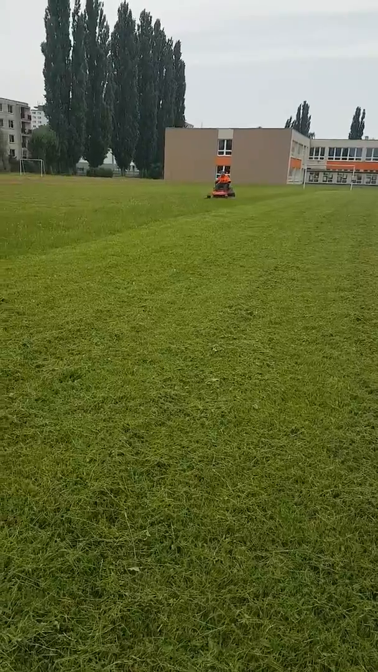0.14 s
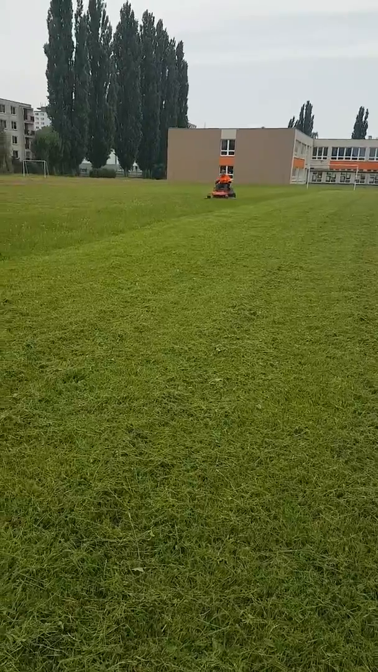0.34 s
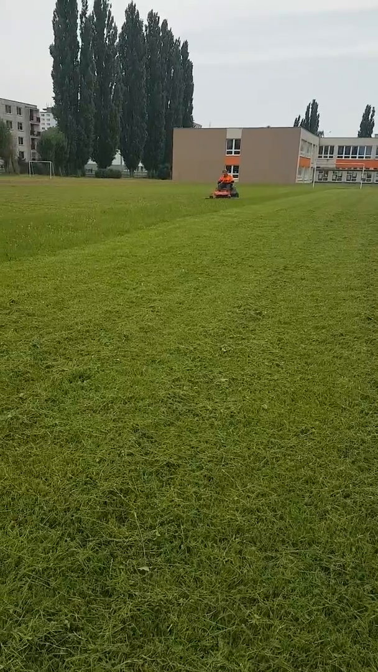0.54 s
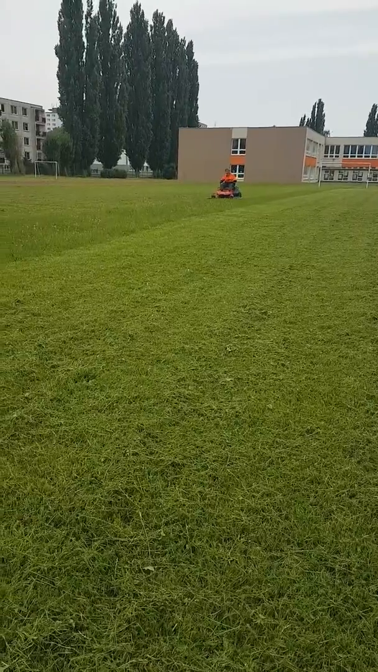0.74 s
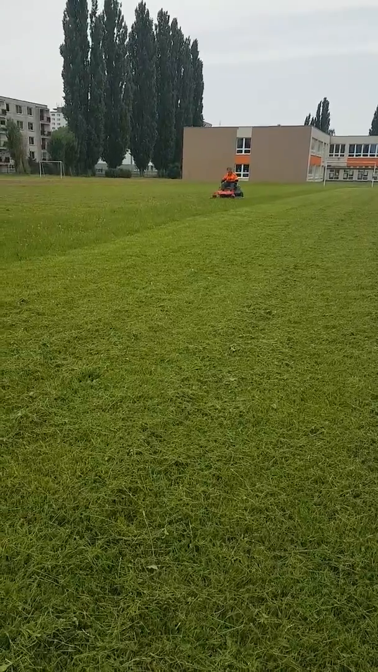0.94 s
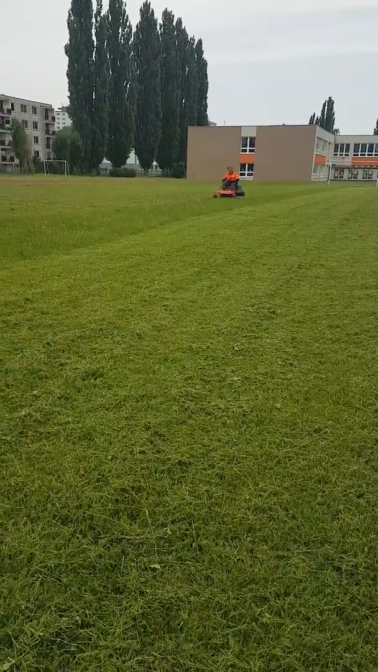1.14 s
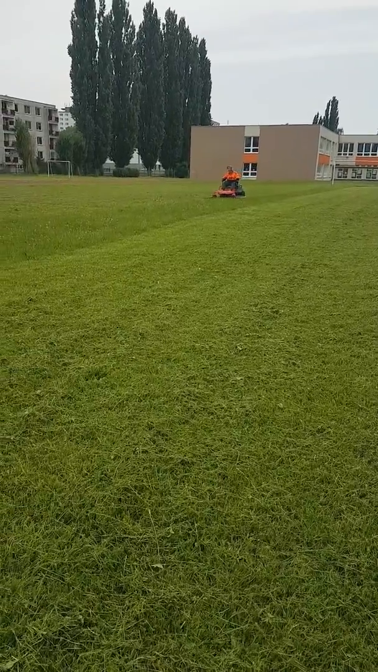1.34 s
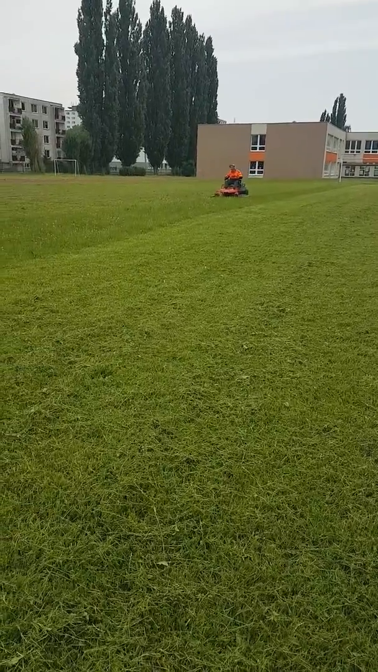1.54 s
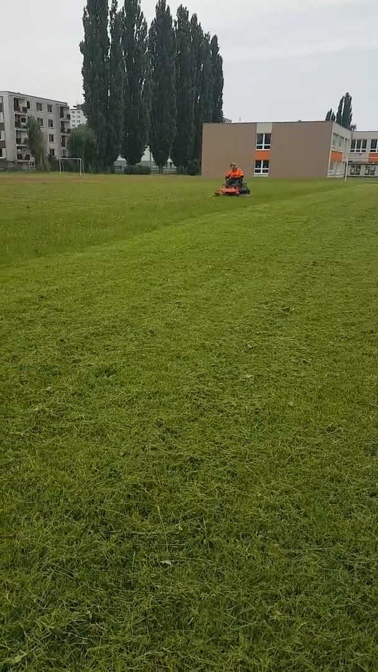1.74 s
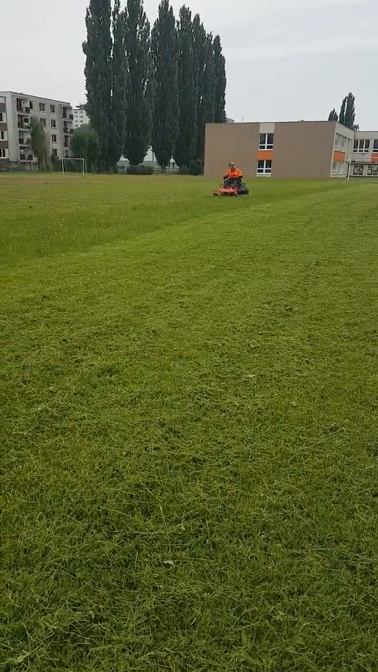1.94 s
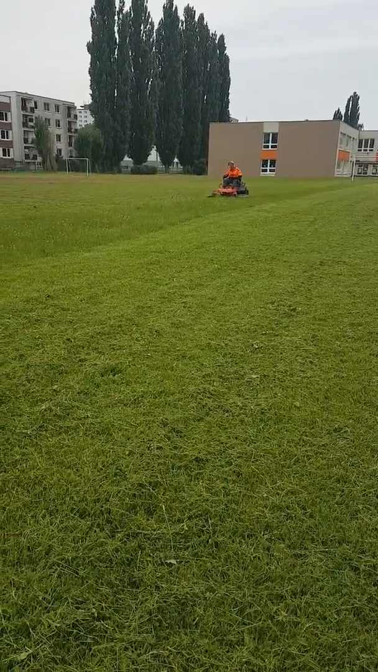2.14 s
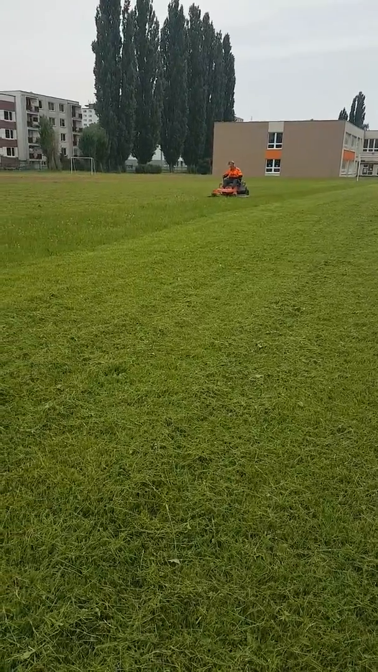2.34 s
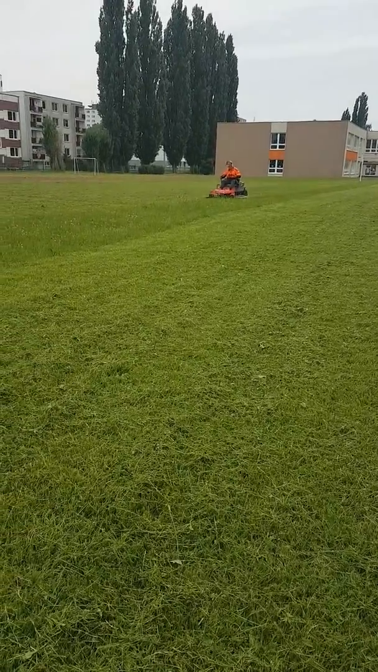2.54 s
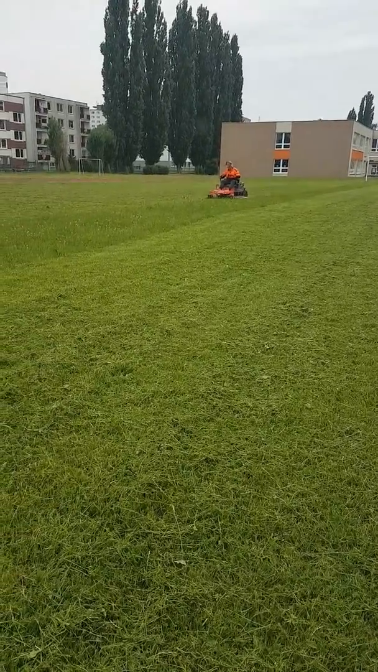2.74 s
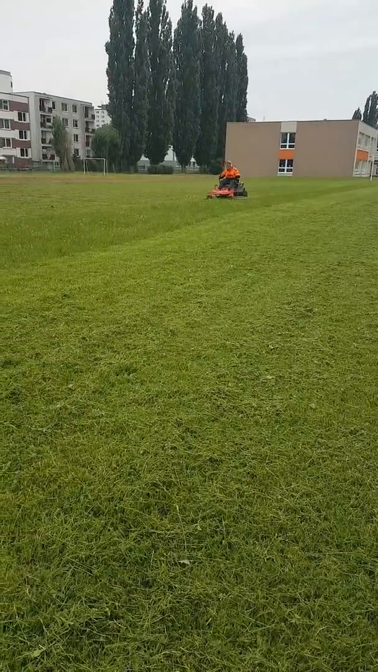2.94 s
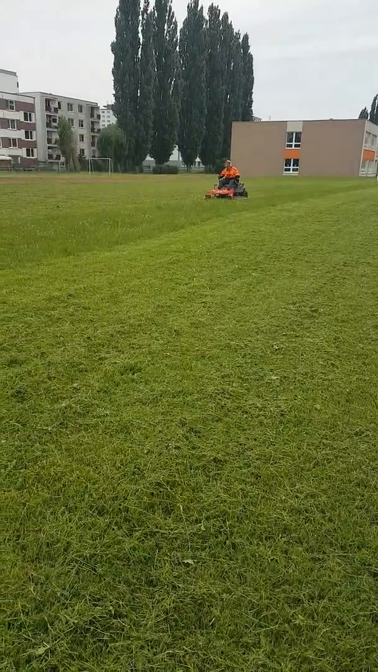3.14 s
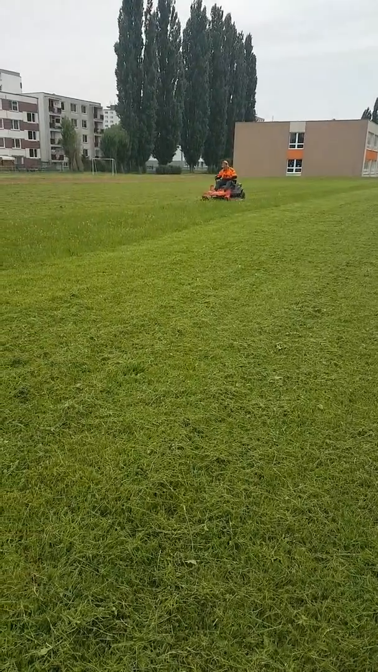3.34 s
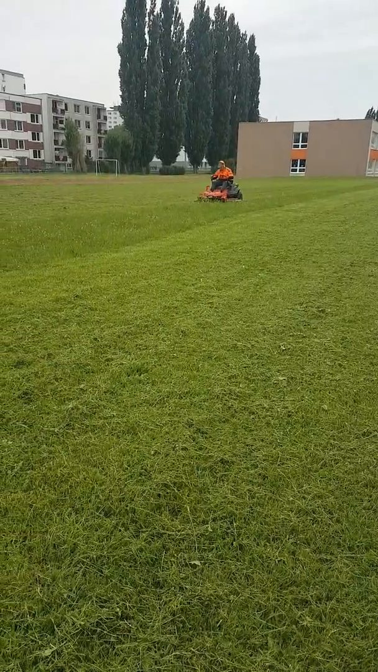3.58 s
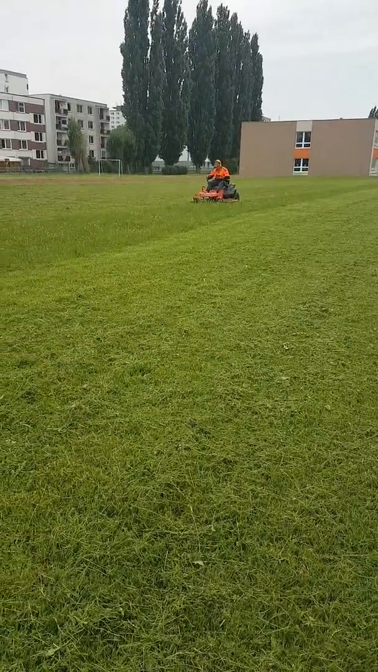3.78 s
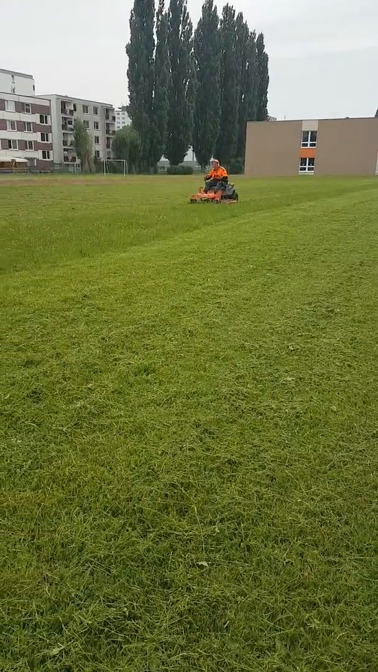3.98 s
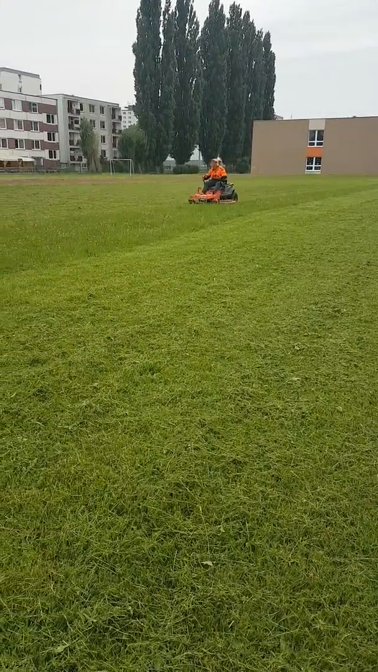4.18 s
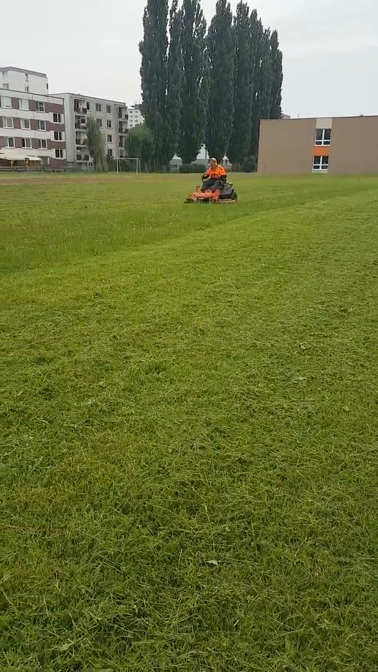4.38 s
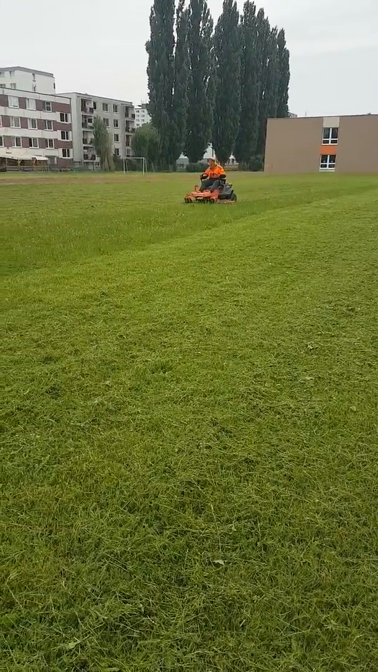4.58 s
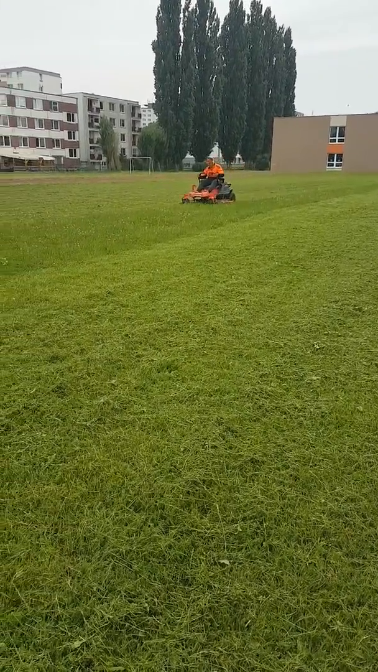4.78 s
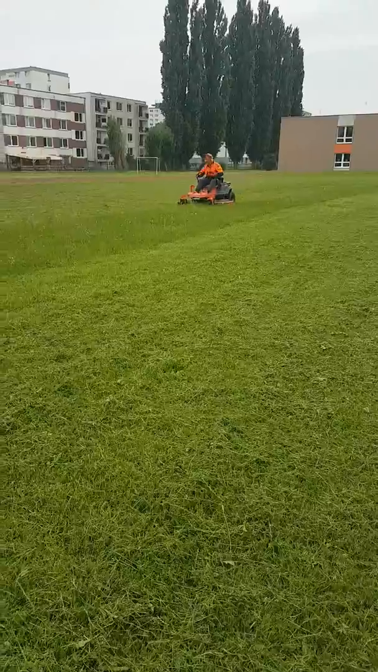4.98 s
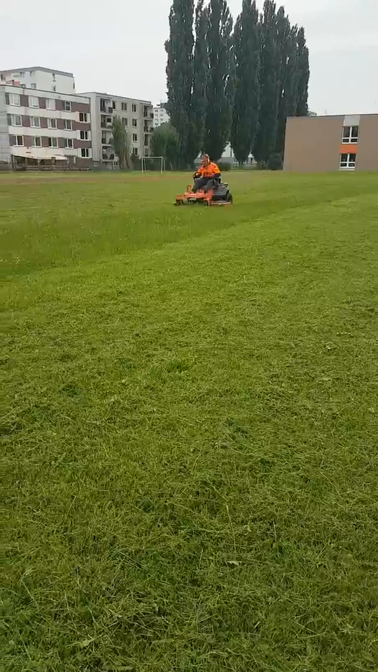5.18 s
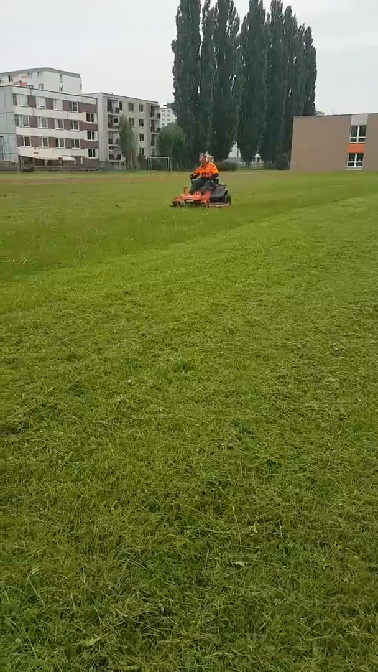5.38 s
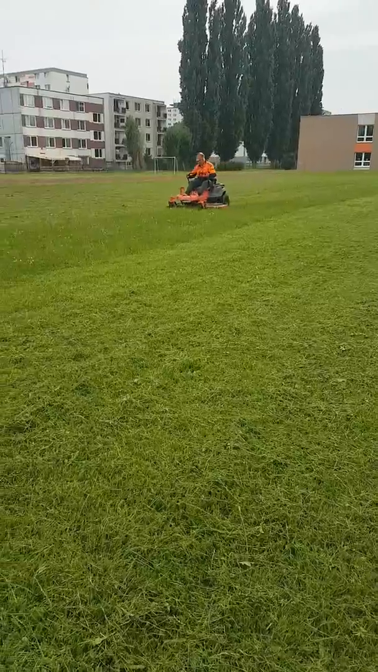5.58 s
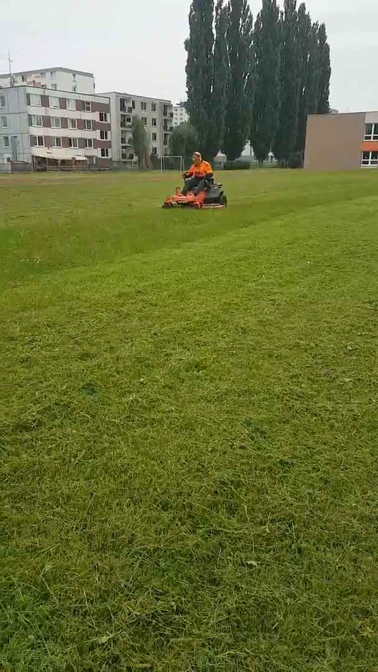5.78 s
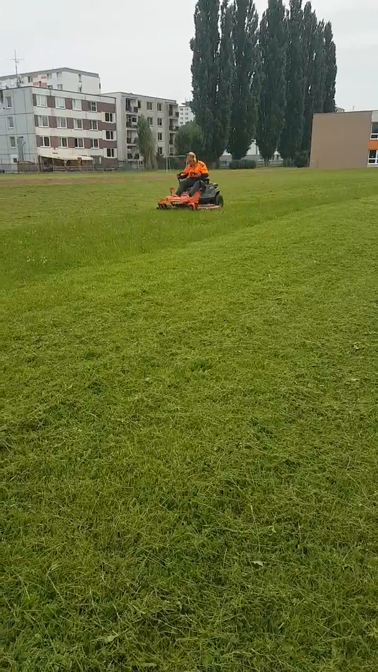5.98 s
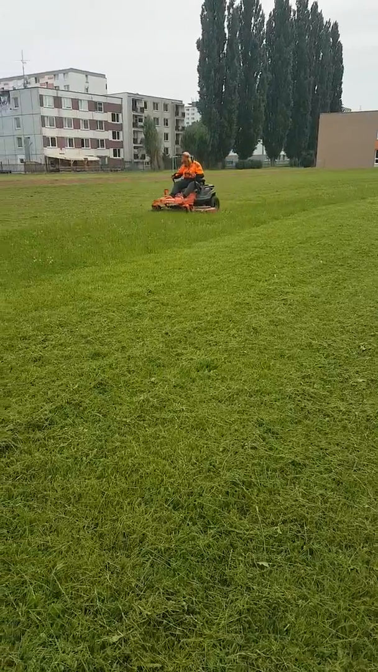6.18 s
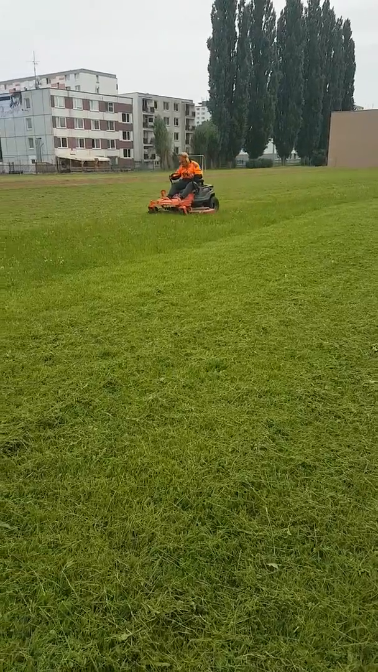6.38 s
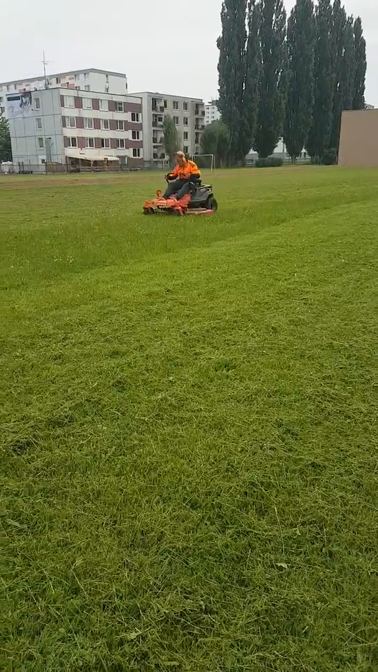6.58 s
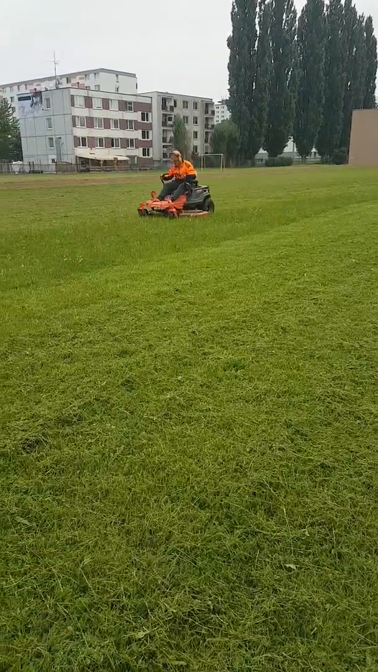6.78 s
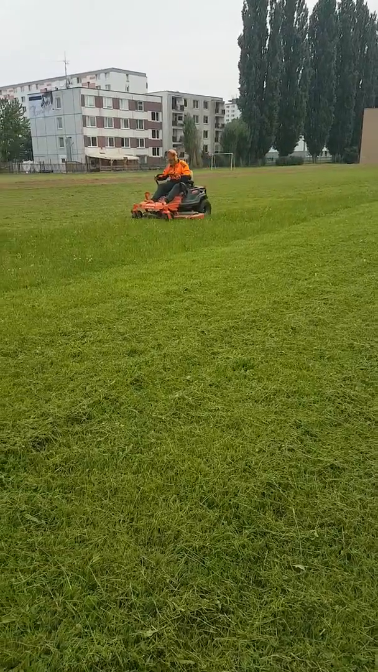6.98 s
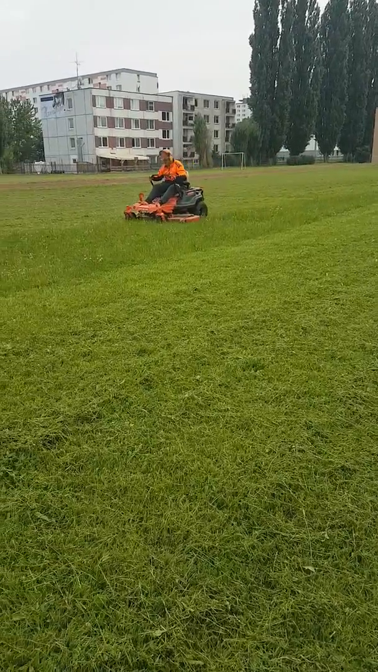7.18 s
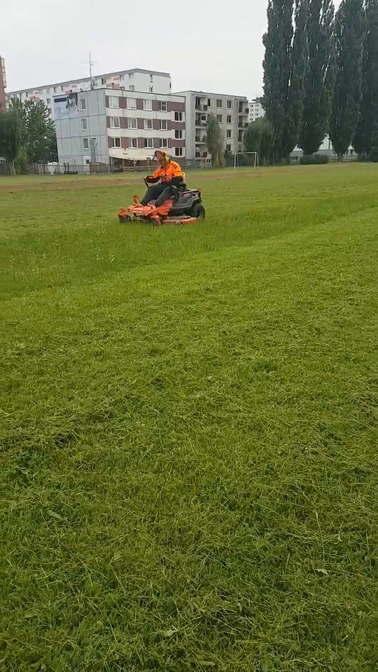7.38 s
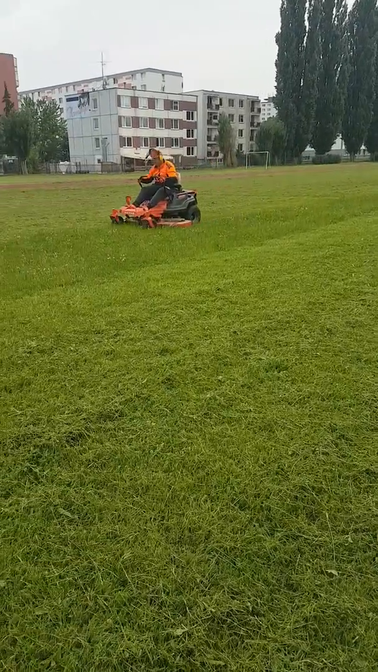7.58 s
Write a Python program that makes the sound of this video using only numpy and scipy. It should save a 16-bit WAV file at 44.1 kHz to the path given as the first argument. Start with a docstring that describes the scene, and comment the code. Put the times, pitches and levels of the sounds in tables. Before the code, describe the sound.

A riding mower approaches across an open field, its engine a steady low drone with rough airy roar and beating blade hum. Grass hisses and ticks under the deck. Finger bumps knock the hand-held microphone early on. The sound grows steadily, then deep bass and wind rumble swell in the last second; the mower never passes or fades.

```python
"""A riding mower comes closer across a wide lawn, heard at the two microphone ports of a hand-held case.
Its exhaust drones on tones tied to the engine cycle; three blades hum and beat as they slip apart.
Filtered noise makes the roar, deck rumble and grass hiss; clicks make ticks and snapping stalks.
The bass swells late on. Short echoes off hand and body colour each port in its own way.
A light wind rumbles on the ports and fingers bump the case."""
import sys
import numpy as np
from scipy import signal
from scipy.fft import rfft, irfft, next_fast_len
from scipy.io import wavfile

SR = 44100
rng = np.random.default_rng(int(sys.argv[2]) if len(sys.argv) > 2 else 0)


def waveform_to_disk(signal):
    """Save audio, clipped to [-1, 1], as 16-bit WAV at the path in sys.argv[1]."""
    frames = np.transpose(np.atleast_2d(signal))
    scaled = np.clip(frames, -1, 1) * 32767
    samples = np.round(scaled).astype(np.int16)
    wavfile.write(sys.argv[1], SR, samples)


N = 336042
SIZE = next_fast_len(N + 8192)  # filter length, padded so that tails do not wrap round
HZ = np.maximum(np.arange(SIZE // 2 + 1) * SR / SIZE, 1)
TIME_S = np.arange(N) / SR

# Straight approach: distance at the start, and driving speed
START_M, DRIVE_M_PER_S = 34.43, 3.384
# Base levels of the sources: (level_db at the start, growth in dB per dB of nearness)
EXHAUST_LEVEL, ROAR_LEVEL, DRONE_LEVEL = (-44.5, 0.47), (-46, 1.15), (-37.5, 0.85)
HISS_LEVEL, SIZZLE_LEVEL = (-46, 1), (-68, 1.69)
HISS_SHARE, ROAR_SHARE = 0.75, 0.29  # how far hiss and roar follow the thick patches
PASSES_PER_CYCLE = 4.515  # blade passes for each engine cycle, before slip
SLIP_LOSS_PER_S = .028  # share of the first slip lost each second
RIGHT_DB, RIGHT_LAG_MS = 1.6, .108  # the direct sound is louder and later at the right port
CUTOFF_HZ = 15700

# Engine speed, sagging under load: (time_s, speed in cycles per s)
ENGINE_SPEED = [(0.0, 23.53), (0.35, 23.29), (0.5, 23.41), (0.65, 23.36), (1.0, 23.7), (1.17, 23.43),
                (1.5, 23.73), (1.76, 23.43), (1.97, 23.7), (2.15, 23.57), (2.4, 23.79), (2.6, 23.6),
                (2.85, 23.93), (3.35, 23.9), (3.6, 23.37), (3.8, 23.6), (3.97, 23.51), (4.48, 24.15),
                (4.68, 24.25), (4.85, 23.42), (5.0, 23.33), (5.25, 23.82), (5.5, 23.5), (5.85, 23.97),
                (6.4, 23.78), (6.8, 23.92), (7.05, 23.62), (7.45, 24.13), (7.62, 24.0)]
# Bass change of exhaust and blades, with one dip and a late swell: (time_s, change_db)
BASS_SWELL = [(0, 0), (4.55, 0), (4.75, -5), (4.9, 0), (6.45, 0), (6.65, 3), (6.8, 8.5), (7.0, 14.5),
              (7.2, 15.5), (7.4, 13.5), (7.62, 15)]
# Thick patches of grass, plus a brief lift in level at 1.65 s during the finger bumps: (centre_s, extra sizzle
# in dB, length_s)
THICK_PATCHES = [(0.374, 3.5, 0.33), (1.65, 1, 0.057), (3.4, 2.5, 0.39), (3.852, 2.5, 0.38),
                 (5.118, 3.5, 0.51), (5.873, 3.5, 0.29), (6.72, 3, 0.055), (7.524, -1.5, 0.46)]
# Exhaust tones, the last row being a tone near the seventh blade pass: (multiple of the engine cycle, relative
# level_db)
EXHAUST_TONES = [(2, -15), (3, -19), (4, -16), (5, 0.5), (5.5, -13), (6, -6.5), (6.5, -12), (7, -10),
                 (8, 1), (9, -7), (10, -11), (11, -2), (12, -9), (12.9, -6), (13, -4), (14, 2), (15, -3),
                 (16, -6), (17, -9), (24.5, -9), (31.5, -15)]
# Three belt-driven blades: (slip at the start in passes per s, start angle in passes,
# then the level_db of multiples 1, 2, 3, 4 and 5 before growth and waver)
BLADE_HUMS = [(-.263, .04, -56, -49.5, -38, -61, -75), (0, 0, -57, -45, -62, -53, -64),
              (.359, .758, -59, -50, -41.5, -45, -57)]
# Growth of each hum multiple: (dB per dB of nearness, dB per dB of bass swell)
HUM_GROWTH = [(1.6, .66), (1.05, .7), (.55, .4), (1.5, 0), (1.5, 0)]
# Wavering of the blade hum: (time_s, change_db)
HUM_WAVER = [(0, -4), (.5, 1.5), (1.0, 1.5), (1.5, -3.5), (2.1, 1), (2.6, 2), (3.0, -1.5), (3.3, 0.8),
             (3.9, 0), (4.4, 1.5), (4.75, -1), (5.2, 4), (5.55, -2.5), (6.0, 3.7), (6.5, -0.8), (7.0, 0),
             (7.3, -1), (7.62, -3.5)]
# Faint whine of the middle blade: (time_s, level_db)
WHINE_LEVEL = [(0, -47.5), (1.1, -47.5), (1.4, -54), (3.0, -52), (3.5, -60), (7.62, -60)]
# Tones of the whine: (multiple of the blade pass, relative level_db)
WHINE_MULTIPLES = [(6, -5), (7, -1), (8, -8)]
# Tone colour of the roar: (frequency_hz, relative level in dB per Hz)
ROAR_COLOUR = [(380, 0), (470, 8.5), (550, 9.5), (760, -1.5), (900, -5.5), (1200, 0.5), (1700, 2.5),
               (2400, -3.5), (2900, -11), (3500, -5.5)]
# Ringing of the deck sheet under the air stream: (pitch_hz, width_hz, boost_db)
DECK_RINGS = [(757, 88, 2), (1151, 49, 4.5), (1715, 47, 6), (2404, 190, 7.5)]
# Slow rise and fall of the roar on top of the approach: (time_s, change_db)
ROAR_RISE_AND_FALL = [(0, -0.5), (2.5, -0.5), (3.6, 0.5), (4.6, 1.5), (5.4, 1), (6.4, 0.5), (7.0, 2.5),
                      (7.62, 1)]
# Tone colour of the low part of the roar: (frequency_hz, relative level in dB per Hz)
DRONE_COLOUR = [(90, 0.5), (130, -10), (200, 0), (330, 10), (430, 7.5), (520, -32)]
# Tone colour of the deck rumble: (frequency_hz, relative level in dB per Hz)
RUMBLE_COLOUR = [(12, -18), (30, -22), (55, 1), (80, -2), (125, -18), (180, 14), (290, 0), (400, -15),
                 (800, -59)]
# Deck rumble, swelling when near: (time_s, level_db)
RUMBLE_SWELL = [(0, -47), (1.5, -53), (3, -51), (3.6, -47), (5, -49), (6.4, -40), (6.75, -36), (6.95, -41),
                (7.3, -31), (7.62, -19.5)]
# Tone colour of the main grass hiss: (frequency_hz, relative level in dB per Hz)
HISS_COLOUR = [(2300, -0.5), (2900, 3.5), (3500, 1.5), (4000, -6.5), (4600, -10), (6000, -14.5),
               (7500, -17), (9500, -32), (12000, -36)]
# Tone colour of the brighter grass sizzle: (frequency_hz, relative level in dB per Hz)
SIZZLE_COLOUR = [(7000, -7), (9500, -8.5), (12000, -4), (14000, -7), (15000, -9), (16500, -13)]
# Stalks snapping under the blades: (start_s, click height in dB before filtering)
STALK_SNAPS = [(0.6483, -47), (2.8683, -43), (3.22, -40), (3.2943, -30), (3.4499, -37), (3.5178, -45),
               (3.6392, -40), (3.8401, -50), (5.5651, -18), (5.9403, -26), (6.6688, -7), (7.328, -10)]
# Tone colour of the wind on the ports: (frequency_hz, relative level in dB per Hz)
WIND_COLOUR = [(12, -12), (30, -13), (50, -6), (90, -4.5), (160, -2), (300, -11), (450, -35)]
# Wind gusts: (time_s, level_db at the left port)
WIND_GUSTS = [(0, -56), (.6, -51), (1.4, -49), (2, -50), (2.6, -60), (3.1, -50), (3.6, -62), (4.1, -60),
              (4.35, -49), (4.8, -54), (5.3, -57), (5.8, -66), (6.5, -60), (6.8, -42), (6.9, -31),
              (7.2, -37), (7.45, -24), (7.62, -27)]
# Wind at the left, then the right port, which faces the wind: (change_db)
WIND_AT_PORTS = [
    [0],
    [6],
]
# Echo bands at the left port: (centre_hz, width_hz, gain_db at the centre,
# sense: -1 where the echo outweighs the direct sound, else 1)
LEFT_ECHOES = [(110, 570, -0.15, 1), (441.5, 676, -21, 1), (1260, 300, -41, 1), (1883, 517, -18.2, 1),
               (2420, 240, -6.5, 1), (2734, 850, -12.5, 1), (3286, 380, -18.5, 1), (3590, 500, -4, 1),
               (4220, 390, -4, 1), (4950, 520, 3.5, 1), (5380, 960, -10, 1)]
# Echo bands at the right port: (centre_hz, width_hz, gain_db at the centre, sense as on the left)
RIGHT_ECHOES = [(542.5, 916, -21.5, 1), (1428, 540, -19, 1), (1898, 820, -12.5, -1), (2864, 1156, -23, 1),
                (4194, 276, -6.5, -1), (5070, 180, -11.5, -1), (6620, 1000, -8, 1), (7500, 1450, -32, 1),
                (8710, 4600, -20, 1), (13000, 1290, -14.5, 1), (14400, 3300, -11, 1)]
# Share of the noise scattered from all around: (frequency_hz, gain_db)
SCATTER_SHARE = [(10, -1), (60, 3), (150, -6), (300, -18), (1500, -17.5), (3000, -14.5), (6000, -5.5),
                 (10000, -5.5), (17000, -1.5)]
# Finger bumps on the case, the sharp ones beside the right port: (start_s, ring height_db
# at the right port, pitch_hz, time to fade by 60 dB in s, left port against right in dB)
FINGER_BUMPS = [(1.636, -23, 85, .09, 0), (1.659, -22, 500, .008, -12), (1.665, -28, 1300, .006, -14),
                (1.668, -22, 130, .03, -9), (1.674, -26, 1100, .006, -14), (1.674, -18.5, 600, .015, -14),
                (1.680, -21, 380, .025, -12), (1.6995, -15, 125, .045, -5), (1.710, -28, 220, .05, 7),
                (1.743, -25, 300, .015, -6)]


def amp(db):
    """Turn decibels into a plain multiplier."""
    return 10 ** (np.asarray(db) / 20)


def rms_one(x):
    """Scale a sound to an average (rms) strength of 1."""
    return x / np.sqrt(np.mean(x ** 2) + 1e-20)


def in_time(rows):
    """Join the points of a (time, value) table with straight lines, one value per sample."""
    times, values = np.transpose(rows)
    return np.interp(TIME_S, times, values)


def drift(rate_hz):
    """Slow random wander of spread 1: noise smoothed twice, drawn once every 40 samples."""
    pole = np.exp(-80 * np.pi * rate_hz / SR)
    noise = rng.standard_normal(N // 40 + 2002)
    slow = signal.lfilter([1], [1, -2 * pole, pole * pole], noise)[2000:]  # drop the settling part
    return np.interp(np.arange(N) / 40, np.arange(len(slow)), rms_one(slow))


def shaped(x, response):
    """Filter a sound by multiplying its spectrum."""
    return irfft(rfft(x, SIZE) * response, SIZE)[..., :N]


def colour(spectrum):
    """Turn a (frequency, dB) table into gains, nearly silent outside its ends."""
    hz, db = np.transpose(spectrum)
    return amp(np.interp(np.log(HZ), np.log(hz), db, left=-80, right=-80))


def peaks(modes):
    """Gains of resonances that stand out of a flat response."""
    return amp(sum(db / (1 + (2 * (HZ - hz) / width_hz) ** 2) for hz, width_hz, db in modes))


def rush(response, gate):
    """Gated, coloured air noise of rms 1 on three unrelated paths: direct, scattered left and right."""
    return rms_one(shaped(rng.standard_normal((3, N)) * gate, response))


def turn(per_s):
    """Add up a turning speed into a running angle."""
    return 2 * np.pi * np.cumsum(per_s) / SR


def nearness():
    """Halving the distance adds about 6 dB."""
    travelled = np.clip(DRIVE_M_PER_S * TIME_S / START_M, 0, .95)
    return -20 * np.log10(1 - travelled)


def patches():
    """Thick grass, and once the finger bumps, give smooth humps of level in dB."""
    return sum(db * np.exp(-2 * ((TIME_S - s) / length) ** 2) for s, db, length in THICK_PATCHES)


def exhaust(cycle, exhaust_db, roar_db):
    """Engine tones nearly in step, so that each firing throbs; high ones follow the roar."""
    out = 0
    for multiple, db in EXHAUST_TONES:
        low = 1 / (1 + (multiple / 11.5) ** 9.0)  # near 1 for low tones, near 0 for high ones
        level_db = db + low * exhaust_db + (1 - low) * (roar_db - 0.5) + drift(6.1)
        phase = rng.normal(0, .55) + .03 * multiple * drift(4.0)
        out = out + amp(level_db) * np.sin(multiple * cycle + phase)
    return np.sqrt(2) * out


def blade_angles(cycle):
    """Each blade is geared to the engine but slips, and the slip eases off."""
    angles = []
    for slip, start, *_ in BLADE_HUMS:
        slipped = slip * (TIME_S - SLIP_LOSS_PER_S * TIME_S ** 2 / 2) + start
        angles.append(PASSES_PER_CYCLE * cycle + 2 * np.pi * slipped)
    return angles


def whine(angle):
    """Faint high tones tied to the passes of the middle blade."""
    tones = sum(amp(db) * np.sin(k * angle + 0.2 * drift(6.7)) for k, db in WHINE_MULTIPLES)
    return amp(in_time(WHINE_LEVEL)) * tones


def blades(angles, near_db, bass_db):
    """Passing blades hum on multiples; uneven grass load shakes their level and phase."""
    out = whine(angles[1])
    waver_db = in_time(HUM_WAVER)
    for k, (near, bass) in enumerate(HUM_GROWTH):
        shake = .14 * (k + 1) * drift(5.0)
        hum = 0
        for row, angle in zip(BLADE_HUMS, angles):
            hum = hum + amp(row[2 + k]) * np.sin((k + 1) * angle + shake)
        level_db = near * near_db + bass * bass_db + waver_db + 1.5 * drift(9.0)
        out = out + np.sqrt(2) * amp(level_db) * hum
    return out


def roar(cycle, roar_db, drone_db):
    """Air noise throbs with each firing, chugs with the load and rings the deck sheet."""
    puffs = amp(0.22 * np.sin(cycle) + 0.42 * drift(2.3) + 0.39 * drift(8.6))
    level_db = roar_db + 10.0 + in_time(ROAR_RISE_AND_FALL)
    main = amp(level_db) * rush(colour(ROAR_COLOUR) * peaks(DECK_RINGS), puffs)
    return main + amp(drone_db) * rush(colour(DRONE_COLOUR), puffs)


def deck_rumble():
    """Low noise from the deck, with a level that swells when near."""
    return amp(in_time(RUMBLE_SWELL)) * rush(colour(RUMBLE_COLOUR), 1)


def grass(cycle, hiss_db, sizzle_db):
    """Two hisses surge with load and firing and flicker separately; clicks make ticks and snaps."""
    load_db = .7 * drift(14.0) + .3 * np.sin(cycle)
    hiss = amp(hiss_db) * rush(colour(HISS_COLOUR), amp(load_db + 1.2 * drift(36.0)))
    hiss += amp(sizzle_db) * rush(colour(SIZZLE_COLOUR), amp(load_db + drift(18.0)))
    tick_times = rng.random(N) < 60 / SR  # about 60 ticks per second
    tick_heights = amp(2.4 * np.minimum(rng.exponential(1, N), 5))
    ticks = tick_times * tick_heights * rng.choice([-1, 1], N)
    snaps = np.zeros(N)
    for s, db in STALK_SNAPS:
        snaps[round(s * SR)] = amp(db)
    band = signal.butter(4, [10500, 15500], "band", fs=SR, output="sos")
    bright_snaps, bright_ticks = signal.sosfilt(band, [snaps, ticks])
    hiss[0] += bright_snaps + amp(sizzle_db - 8.0) * rms_one(bright_ticks)  # direct path only
    return hiss


def port(echoes):
    """Each echo changes a band, mostly by cancelling it; a strong one also turns the phase round."""
    response = 1
    for hz, width_hz, gain_db, sense in echoes:
        detune, damping = hz ** 2 - HZ ** 2, 1j * HZ * width_hz
        centre_gain = np.sign(sense) * amp(gain_db)
        response = response * (detune + centre_gain * damping) / (detune + damping)
    return response


def at_ports(mower, noise):
    """Direct sound reaches both ports; separate scattered noise comes from all around."""
    lag = amp(RIGHT_DB) * np.exp(-2j * np.pi * HZ * RIGHT_LAG_MS / 1000)
    direct = shaped(mower, np.array([port(LEFT_ECHOES), lag * port(RIGHT_ECHOES)]))
    scattered = shaped(noise[1:], colour(SCATTER_SHARE)) * amp([[0], [-7]])
    return direct + scattered


def wind():
    """Lumpy low noise, made separately for each port."""
    lumps = amp([3.0 * drift(6.0), 3.0 * drift(6.0)])
    rumble = rms_one(shaped(rng.standard_normal((2, N)) * lumps, colour(WIND_COLOUR)))
    return amp(in_time(WIND_GUSTS) + np.array(WIND_AT_PORTS)) * rumble


def ring(clicks, hz, t60):
    """A unit click starts a sine of height 1 that fades by 60 dB in t60 seconds."""
    r, w = amp(-60 / (t60 * SR)), 2 * np.pi * hz / SR
    return signal.lfilter([0, np.sin(w)], [1, -2 * r * np.cos(w), r * r], clicks + 1e-18)


def bumps():
    """Each finger bump sets off a short ring of the case."""
    out = np.zeros((2, N))
    for s, db, hz, t60, left_db in FINGER_BUMPS:
        click = np.zeros(N)
        click[round(s * SR)] = amp(db)
        out += ring(click, hz, t60) * amp([[left_db], [0]])
    return out


def scene():
    """Mix the approaching mower at both ports, then add the wind and finger bumps."""
    cycle, near_db = turn(in_time(ENGINE_SPEED)), nearness()
    bass_db, thick_db = in_time(BASS_SWELL), patches()
    levels = (EXHAUST_LEVEL, ROAR_LEVEL, DRONE_LEVEL, HISS_LEVEL, SIZZLE_LEVEL)
    exhaust_db, roar_db, drone_db, hiss_db, sizzle_db = (db + growth * near_db for db, growth in levels)
    roar_db = roar_db + ROAR_SHARE * thick_db
    hiss_db = hiss_db + HISS_SHARE * thick_db
    sizzle_db = sizzle_db + thick_db
    tones = exhaust(cycle, exhaust_db + bass_db, roar_db)
    tones = tones + blades(blade_angles(cycle), near_db, bass_db)
    noise = roar(cycle, roar_db, drone_db) + deck_rumble() + grass(cycle, hiss_db, sizzle_db)
    return at_ports(tones + noise[0], noise) + wind() + bumps()


def record(dry):
    """A steep low-pass filter cuts the top of the treble."""
    return signal.sosfilt(signal.ellip(12, .5, 70, CUTOFF_HZ, fs=SR, output="sos"), dry)


dry = scene()
out = record(dry)
waveform_to_disk(out)
```